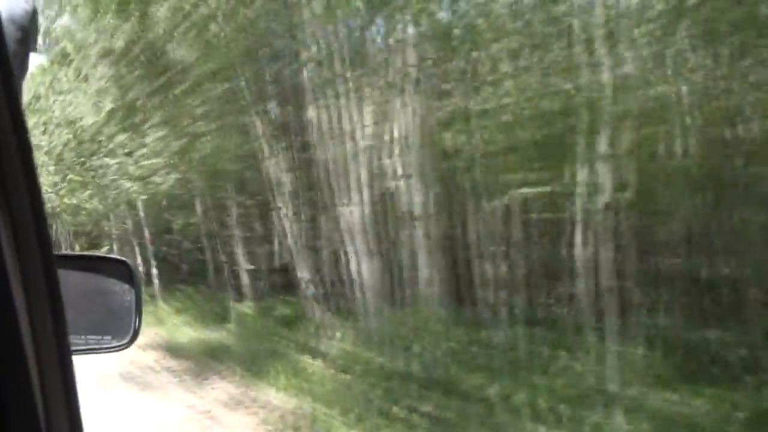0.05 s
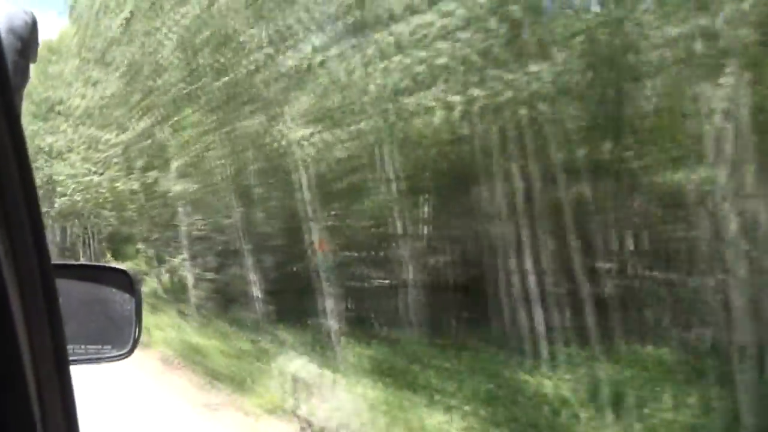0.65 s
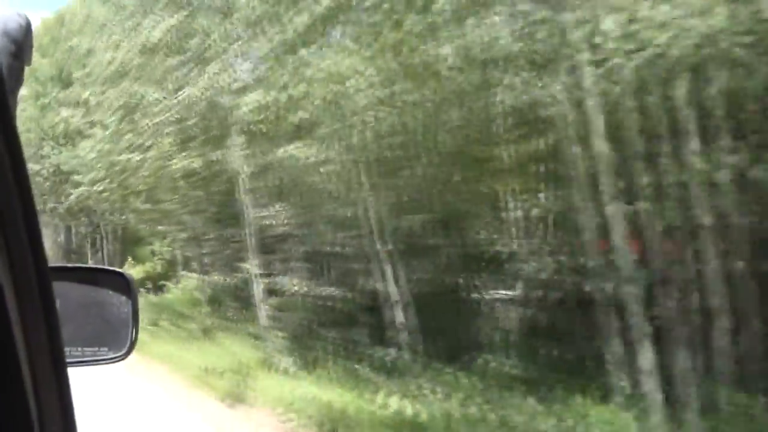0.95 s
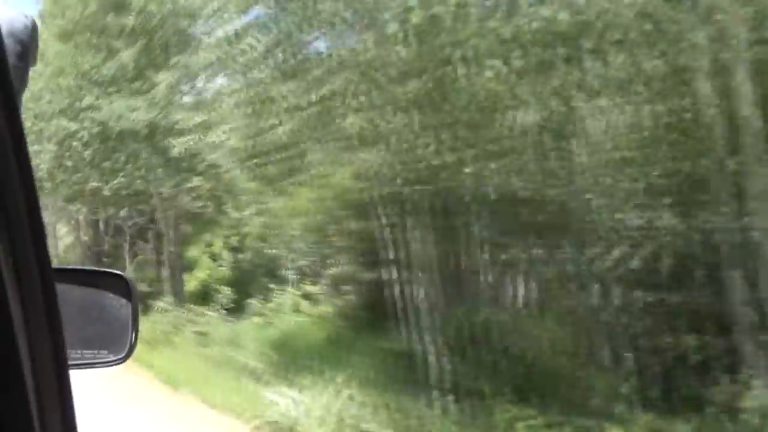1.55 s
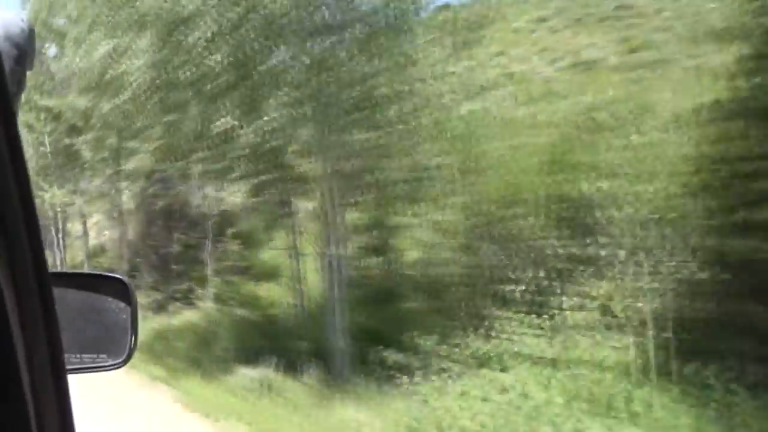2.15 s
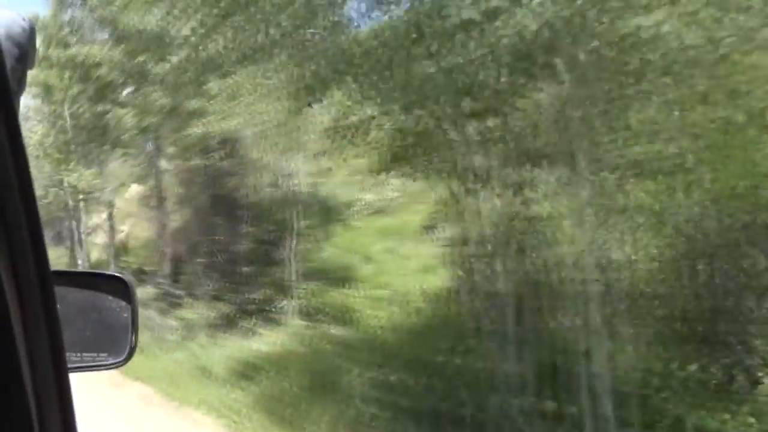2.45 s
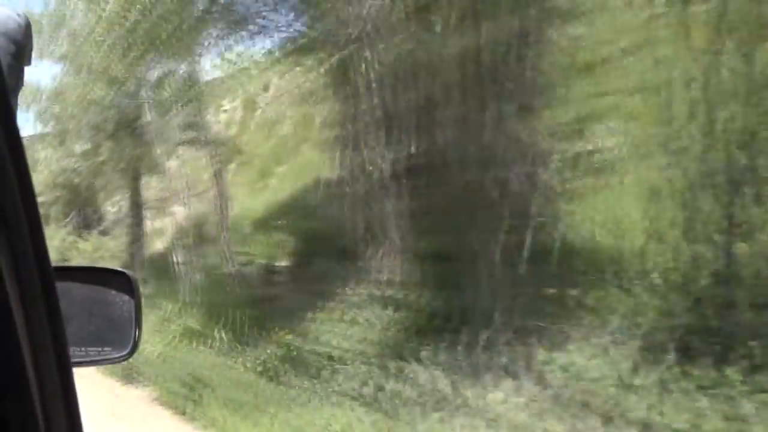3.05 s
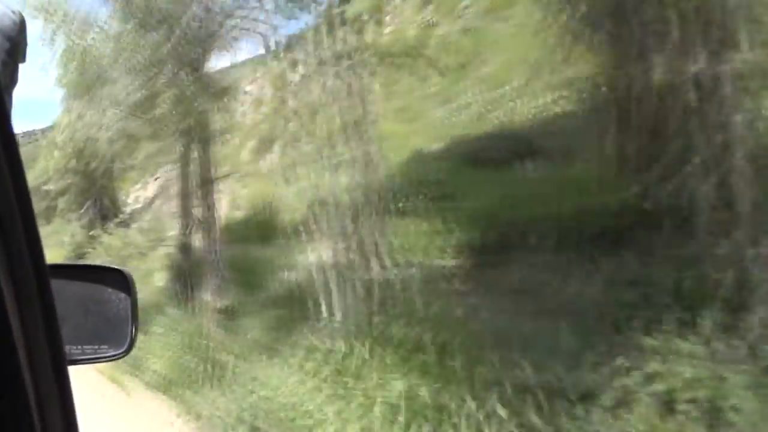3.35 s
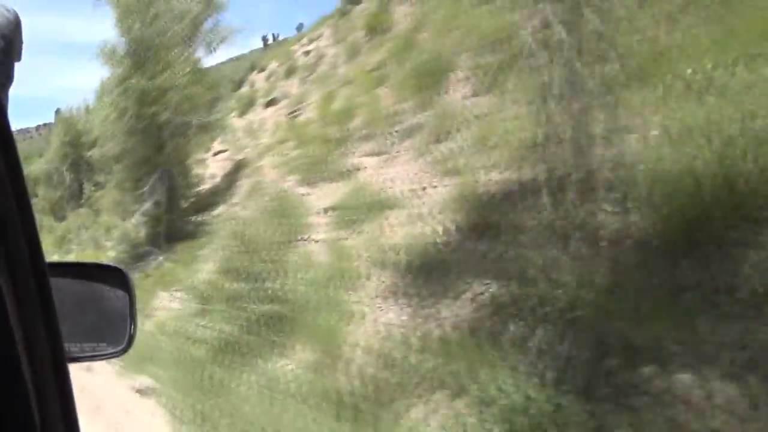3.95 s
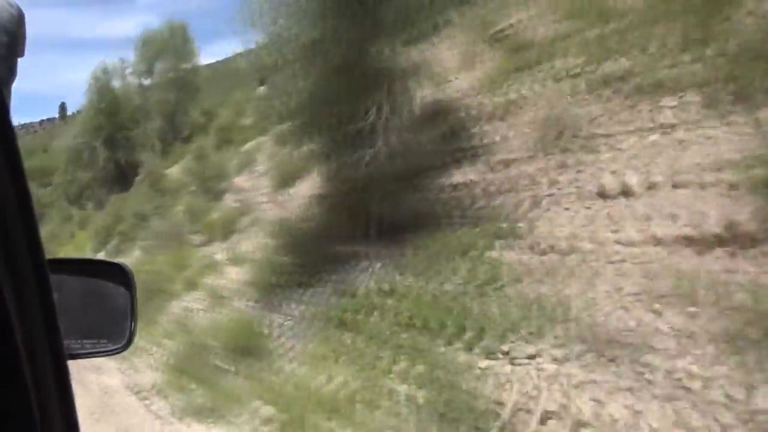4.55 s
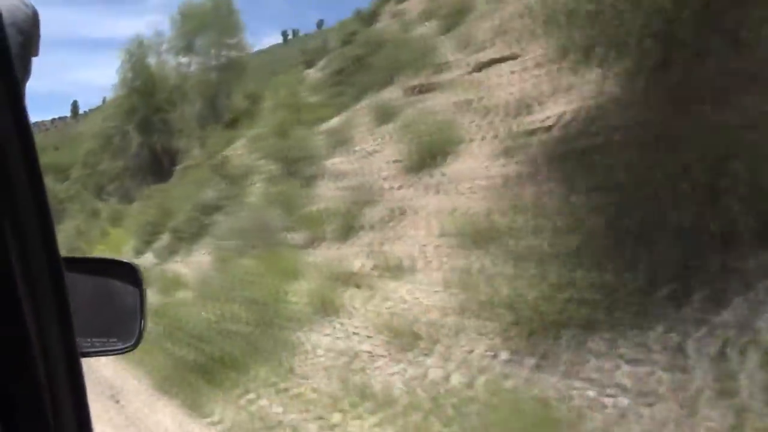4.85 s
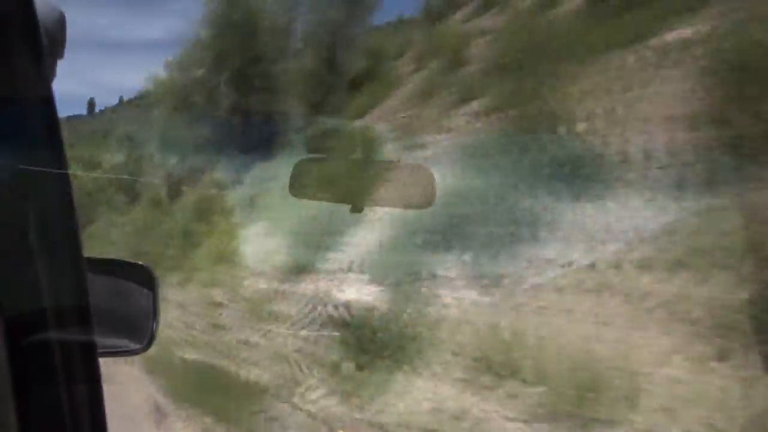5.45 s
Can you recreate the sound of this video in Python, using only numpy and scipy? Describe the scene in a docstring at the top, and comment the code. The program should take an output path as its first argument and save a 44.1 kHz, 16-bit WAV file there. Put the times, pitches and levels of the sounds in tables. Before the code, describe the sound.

A loud, low rumble of rushing air hits the microphone from start to finish as a car rolls down a dirt track with its window open. The wind flutters and thumps unevenly, mostly on the right, with a raspy edge. Far quieter are the gritty tyre hiss and thin buzzing of roadside insects, one sinking slightly in pitch as it passes midway. A broad hiss and high buzz rise at the close.

```python
"""A four-wheel-drive rolls along a dirt road with a side window open. From the start the turbulent
slipstream buffets the microphone, mostly its right port: a deep rumble, with flutter and rasp riding
on the eddies, over a faint hiss of tyres. Patches of insects buzz by in the roadside grass, their
song modulated by wing strokes. Near 2.6 s one passes close, its pitch sinking by the Doppler effect.
From about 5.2 s a broad hiss and a high insect buzz swell, with a lower hiss on the left."""
import sys
import numpy as np
from scipy import signal
from scipy.fft import rfft, irfft, next_fast_len
from scipy.io import wavfile
from scipy.ndimage import uniform_filter1d, minimum_filter1d

SR = 44100
rng = np.random.default_rng(int(sys.argv[2]) if len(sys.argv) > 2 else 0)


def dump(signal):
    """Clip the signal to [-1, 1] and save it as 16-bit WAV at the path in sys.argv[1]."""
    limited = np.clip(np.atleast_2d(signal).T, -1, 1)
    pcm = np.round(limited * 32767).astype(np.int16)
    wavfile.write(sys.argv[1], SR, pcm)


N = 247401
TIME = np.arange(N) / SR
SIZE = next_fast_len(N, real=True)
FREQS = np.maximum(np.arange(SIZE // 2 + 1) * SR / SIZE, 1)


# turbulent pressure spectrum, falling steeply towards the small eddies: f/Hz, level/dB
WIND_SPECTRUM = [(22, -34), (45, -4), (70, -0.5), (110, -0.5), (170, -2), (250, -7), (480, -16),
                 (700, -24.5), (1000, -33.5), (1700, -45), (2800, -55.5), (4500, -61), (7200, -68.5),
                 (15000, -76)]
# strength of the slipstream about its mean: t/s, level/dB
FLOW_LEVEL = [(0.0, 2), (0.55, -0.5), (0.72, 0), (2.42, -0.5), (2.6, 0.5), (3.6, 0.5), (4.1, -0.5),
              (4.7, 2.5), (5.15, 0), (5.35, 1.5), (5.6, 2.5)]
RUMBLE_DB, FLUTTER_DB, RASP_DB = -10.5, -22.5, -42.5   # base gains of large, middling and small eddies
def slipstream():
    """Turbulent intermittency: small eddies ride on larger ones, so the higher bands come in lumps."""
    flow_db = in_time(FLOW_LEVEL)[0] + 1.2 * drift(rate_hz=11.4)
    stall_db = stalls()
    rasp_db = RASP_DB + 2.14 * flow_db + 0.99 * stall_db
    eddies = rms_one(drift(rate_hz=61) + .5 * drift(rate_hz=400))
    lumps = lambda shared_db, own_db: from_db(shared_db * eddies + own_db * drift(rate_hz=265))
    rumble = evened(noise(WIND_SPECTRUM, low_hz=24, high_hz=288.5) * lumps(1.5, 0.84), span_s=0.036)
    flutter = evened(noise(WIND_SPECTRUM, low_hz=281, high_hz=1240) * lumps(3.5, 1), span_s=0.039)
    tearing = evened(lumps(1.5, 3), span_s=0.023)
    rasp = noise(WIND_SPECTRUM, low_hz=1112) * tearing
    lull = lulls(lead_s=0.0085, width_s=0.0034)
    crackle_left, crackle_right = crackles()
    right = (rumble * from_db(RUMBLE_DB + 1.6 * drift(rate_hz=42) + stall_db - 0.77 * lull)
             + flutter * from_db(FLUTTER_DB + flow_db + 0.51 * stall_db - 4.5 * lull)
             + rasp * from_db(rasp_db - 3.3 * lull)
             + stray_eddies() * from_db(-47.5 + flow_db + stall_db - lull)
             + buffets() + crackle_right)
    left = crossfeed(right) + fizz(rasp_db) * tearing + crackle_left
    return np.array([left, right])


# single eddies striking the port: t/s, level/dB, duration/s, relative push/dB, relative rasp/dB
EDDY_IMPACTS = [(0.009, -22.5, 0.014, 6, -21), (0.129, -20.5, 0.02, -0.5, -34),
                (0.165, -16, 0.037, 8.5, -28), (0.215, -12, 0.029, -2.5, -35),
                (0.324, -12.5, 0.016, -1, -32), (0.355, -20.0, 0.025, 13, -20),
                (0.382, -14.5, 0.012, 0, -31), (0.434, -15, 0.02, 11, -22), (0.482, -12, 0.012, 11, -22.5),
                (0.522, -16.5, 0.028, -2, -25), (0.562, -19.5, 0.029, -5.5, -24),
                (0.614, -26, 0.025, 11, -26), (0.653, -18.5, 0.0082, 8, -27),
                (0.745, -22.5, 0.011, 7.5, -24), (0.808, -18.5, 0.026, 0, -22.5),
                (0.874, -16.5, 0.016, 2.5, -21), (0.927, -17.5, 0.022, 10, -22),
                (0.977, -19.5, 0.009, -2, -23), (1.145, -16.0, 0.036, -8.5, -23.5),
                (1.19, -23.5, 0.02, -9, -16), (1.235, -17.5, 0.015, -2, -30),
                (1.418, -12.5, 0.009, 4.5, -34), (1.454, -17.5, 0.026, 3, -22),
                (1.515, -19.5, 0.014, -4, -23), (1.621, -22.5, 0.014, 4, -29),
                (1.713, -18.0, 0.014, 1, -30), (1.864, -20.5, 0.014, 21.5, -17),
                (1.961, -17.5, 0.015, 14, -29), (2.027, -20, 0.021, 7, -34), (2.057, -26, 0.013, 16.5, -16),
                (2.227, -19, 0.028, -0.5, -24), (2.285, -19.5, 0.01, 11.5, -19.5),
                (2.38, -23, 0.031, 13, -27), (2.508, -17, 0.02, 5, -26), (2.577, -17.0, 0.014, -8, -32),
                (2.61, -24.0, 0.011, 12.5, -21), (2.632, -19, 0.011, -13, -26),
                (2.726, -19, 0.023, 9.5, -30), (2.805, -17.5, 0.024, 5, -29),
                (2.915, -17.5, 0.04, 10.5, -28), (3.001, -18.5, 0.028, 12.5, -31),
                (3.047, -19, 0.012, -5.5, -31), (3.119, -14.5, 0.029, -0.5, -28),
                (3.163, -19, 0.021, 13.5, -21), (3.3, -17.5, 0.013, -3, -24),
                (3.337, -17.5, 0.014, 2.5, -26), (3.441, -17, 0.026, 3, -34), (3.484, -19, 0.031, 4.5, -29),
                (3.553, -19.5, 0.017, -2, -22), (3.578, -16.5, 0.022, 2.5, -28),
                (3.65, -15.5, 0.018, 2.5, -23.5), (3.743, -21, 0.012, 6.5, -24),
                (3.8, -19.5, 0.021, 14.5, -31), (3.899, -18, 0.012, 3.5, -26),
                (4.042, -22.5, 0.02, 10.5, -18), (4.205, -17.0, 0.025, 7, -32),
                (4.242, -16, 0.014, 7.5, -28), (4.268, -15.5, 0.051, -7, -24.5),
                (4.409, -15.5, 0.018, 3, -27), (4.453, -27, 0.015, 12, -16),
                (4.499, -11.5, 0.0077, -3, -36), (4.548, -17, 0.01, 14, -27), (4.629, -18, 0.051, 0, -25),
                (4.797, -21.5, 0.014, 16, -22), (4.866, -18.5, 0.03, 5, -23),
                (4.901, -15.5, 0.021, 12.5, -26), (4.956, -33.5, 0.011, -3, -27),
                (5.036, -17.5, 0.019, 3, -27), (5.166, -20.5, 0.0084, -1.5, -28),
                (5.232, -17, 0.018, 0.5, -29), (5.353, -13, 0.015, 3, -25), (5.58, -17, 0.024, -12, -19)]
SLAP_RISE_S, PUSH_RISE_S = 0.0018, 0.0033
def buffets():
    """An eddy's impact is a broadband pressure pulse: push, thud, smack and rasp die away together."""
    slaps = bursts([row[:3] for row in EDDY_IMPACTS], SLAP_RISE_S, steepness=2.36)
    push_rows = [(s, db + push_db, length_s) for s, db, length_s, push_db, _ in EDDY_IMPACTS]
    shoves = bursts(push_rows, PUSH_RISE_S, steepness=3)
    push = evened(noise(WIND_SPECTRUM, low_hz=60, high_hz=200), span_s=0.022)
    thud = from_db(2) * evened(noise(WIND_SPECTRUM, low_hz=252, high_hz=522), span_s=0.012)
    smack = from_db(-8) * evened(noise(WIND_SPECTRUM, low_hz=519, high_hz=1420), span_s=0.0061)
    rasp = noise(WIND_SPECTRUM, low_hz=1350) * from_db(-2 + 4.2 * drift(rate_hz=240))
    return shoves * push + slaps * (thud + smack) + puffs() * rasp


def puffs():
    """Eddy break-up: the envelope of the rasp that each impact tears off."""
    rows = [(s, db + rasp_db, length_s) for s, db, length_s, _, rasp_db in EDDY_IMPACTS]
    return bursts(rows, SLAP_RISE_S, steepness=4)


def lulls(lead_s, width_s):
    """Flow detachment: the air lets go of the port just before each impact; depth from 0 to 1."""
    dip = np.zeros(N)
    for s, *_ in EDDY_IMPACTS:
        near = slice(max(int(s * SR) - SR // 10, 0), int(s * SR) + SR // 50)
        dip[near] += np.exp(-((TIME[near] - s + lead_s) / width_s) ** 2)
    return np.minimum(dip, 1)


# brief stalls of the flow: t/s, level change/dB, half-duration/s
FLOW_STALLS = [(0.09, -5, 0.044), (0.287, -7.5, 0.027), (0.418, -3, 0.011), (0.674, -4, 0.023),
               (1.27, -3.5, 0.01), (1.797, -4, 0.041), (1.896, -3.5, 0.0069), (1.99, -6, 0.007),
               (2.159, -9, 0.019), (2.476, -2.5, 0.022), (2.894, -4.5, 0.018), (2.986, -10, 0.015),
               (3.098, -6, 0.0068), (3.407, -5.5, 0.028), (3.68, -7, 0.01), (3.835, -5, 0.007),
               (4.014, -18, 0.011), (4.144, -5, 0.014), (4.364, -6, 0.049), (4.7, -1, 0.008),
               (4.839, -6, 0.012), (5.195, -3.5, 0.015), (5.288, -11, 0.013)]
def stalls():
    """Flow noise needs moving air, so it dips abruptly at each stall; the dip in dB."""
    return sum(db * np.exp(-np.minimum(((TIME - s) / half_s) ** 4, 50)) for s, db, half_s in FLOW_STALLS)


# airflow tearing off the port: t/s, level/dB, duration/s, relative treble/dB
SEPARATIONS = [(0.166, -32.5, .002, -3), (0.211, -29.5, 0.0028, -14), (0.335, -28, 0.0032, -6),
               (0.363, -41, 0.0022, 2), (0.433, -33, 0.0033, 2), (0.484, -33, .002, -10),
               (0.573, -33, .003, 0), (0.867, -40, .002, -4), (0.949, -37, 0.0023, -5),
               (1.154, -34, 0.0032, -8), (1.168, -29, 0.0022, -5), (1.199, -33.5, 0.0054, -4),
               (1.247, -32, .003, -2), (1.421, -38, 0.0023, -18), (2.56, -28.5, 0.003, -11),
               (2.617, -36, .002, -3), (2.738, -31, 0.008, -11), (3.203, -37.5, 0.0017, 3),
               (3.299, -36, 0.0034, -10), (3.343, -42, .002, 0), (3.644, -34, 0.0017, -4),
               (3.66, -35, 0.0035, -11), (3.998, -37, 0.0018, -13), (4.267, -32, 0.0017, 2.5),
               (4.295, -32, .003, 0), (4.635, -30.5, 0.005, -1), (4.866, -27, 0.0033, -11),
               (5.065, -34, 0.0035, -4), (5.241, -33, .002, -6)]
def crackles(rise_s=0.0025, low_hz=1300, treble_hz=4800, top_hz=10000):
    """Flow separation spits dense bursts of tiny clicks, some dull, some bright; left and right."""
    grit = grains(per_s=6000)
    body = grit * bursts([row[:3] for row in SEPARATIONS], rise_s, steepness=3)
    treble_rows = [(s, db + treble_db, length_s) for s, db, length_s, treble_db in SEPARATIONS]
    treble = grit * bursts(treble_rows, rise_s, steepness=3)
    colour = rms_one(from_db(over_hz(WIND_SPECTRUM)) * above(low_hz, 4) * below(top_hz, 4))
    right = filtered(body, colour * below(treble_hz, 6)) + filtered(treble, colour * above(treble_hz, 6))
    left = from_db(-16) * filtered(treble, rms_one(from_db(over_hz(FIZZ_SPECTRUM))))
    return left, right


def stray_eddies():
    """A Poisson process: small eddies tick dully on the port at independent moments; rms 1."""
    colour = from_db(over_hz(WIND_SPECTRUM)) * above(750, 6) * below(2400, 4)
    return rms_one(filtered(grains(per_s=90), colour))


# share of the right port's wind heard on the left: f/Hz, amplitude ratio (negative = inverted)
PORT_TRANSFER = [(30, -0.18), (65, 0.24), (90, 0.36), (130, 0.62), (175, 0.55), (250, 0.48), (350, 0.26),
                 (480, 0.18), (600, -0.22), (800, -0.14), (900, -0.073), (1000, -0.15), (1250, -0.15),
                 (1700, 0.065), (4500, 0.12), (6000, -0.032)]
# gain on that share's upper band as the flow shifts: t/s, level/dB
LEAK_LEVEL = [(0, -3.5), (1.9, -0.5), (3.0, 1.5), (5.6, 1)]
def crossfeed(right, split_hz=270):
    """A transfer function: the right port faces the flow and the left hears a weaker, filtered copy."""
    share = over_hz(PORT_TRANSFER)
    lower = filtered(right, share * below(split_hz, 8))
    upper = filtered(right, share * above(split_hz, 8))
    return lower + upper * from_db(in_time(LEAK_LEVEL)[0])


# the left port's own thin fizz: f/Hz, level/dB
FIZZ_SPECTRUM = [(1200, -8), (4500, -20), (5200, -6.5), (6200, -3), (8200, -1.5), (10800, -25),
                 (11800, -30)]
def fizz(rasp_db):
    """Incoherent addition: the left port's fizz follows the summed powers of rasp and puffs."""
    return noise(FIZZ_SPECTRUM) * np.hypot(from_db(rasp_db - 16), from_db(-15) * puffs())


# passage of one insect beside the road: t/s, level/dB, left minus right/dB
NEAR_PASSAGE = [(1.3, -80, 9), (1.9, -58, 10), (2.1, -54.5, 11), (2.22, -50, 12), (2.3, -47, 12),
                (2.45, -46, 9), (2.54, -44.5, 5), (2.61, -47.5, 3), (2.8, -49, -3), (2.92, -54, -2),
                (3.02, -63, -2), (3.2, -85, 0)]
# its song: f/Hz, level/dB
NEAR_SPECTRUM = [(7000, -27), (7700, -12.5), (8300, -4), (9000, -1.5), (9500, 1), (10400, -2.5),
                 (11100, -8.5), (11700, -14), (13000, -14.5), (14200, -18.5), (15500, -33)]
STROKES_HZ, SONG_CENTRE_HZ, WANDER_SHARE = 44.66, 9490, 0.01   # common to this insect and the patches
def near_insect(pass_s=2.58, turn_s=0.12, doppler_share=0.013):
    """Doppler effect: a close insect chirps once per wing stroke, beat and pitch sinking as it passes."""
    level_db, pan_db = in_time(NEAR_PASSAGE)
    doppler = -doppler_share * np.tanh((TIME - pass_s) / turn_s)
    cycles = rng.random() + np.cumsum(STROKES_HZ * (1 + doppler)) / SR
    cycles += 0.06 * drift(rate_hz=40)   # uneven timing
    depth_db = np.maximum(5 + 0.27 * (level_db - level_db.max()), 0)   # strokes blur as the song fades
    strokes = from_db(depth_db * np.sin(2 * np.pi * cycles) + 1.8 * drift(rate_hz=90))
    strokes = evened(strokes, span_s=0.045)
    band = lambda: noise(NEAR_SPECTRUM, low_hz=7000, high_hz=11100, order=50)
    separate = np.array([band(), noise(NEAR_SPECTRUM, low_hz=7000)])
    song = rms_one(separate + from_db(-5.5) * band())
    song = shifted(song, SONG_CENTRE_HZ * (doppler + WANDER_SHARE * drift(rate_hz=60)))
    return from_db(level_db) * strokes * song * panned(pan_db)


# patches of insects: loudest t/s, swell time scale/s, left minus right/dB, stroke depth (0-1),
# buzz centre f/Hz, buzz level/dB, shrill level/dB, thin level/dB
INSECT_PATCHES = [(.12, 0.2, 2.5, 0.26, 9050, -50.5, -59, -68), (.25, 0.2, 2.5, 0.2, 10050, -57, -58, -70),
                  (.5, 0.53, 0, 0.14, 9450, -59.5, -60.5, -82),
                  (1.1, 0.559, -0.5, .15, 9450, -62, -65.5, -85),
                  (1.701, .4, 9, .25, 9250, -63, -68, -65.5),
                  (2.35, 0.27, 10.5, 0.1, 9600, -66.5, -58, -74),
                  (3.451, .25, 5.5, 0.2, 9500, -62, -65, -65), (3.789, 0.18, 8, 0.55, 9700, -56, -62, -63),
                  (5.59, 0.2, 13, 0.3, 9740, -52, -55.5, -56.5)]
# their main buzz: f/Hz, level/dB
BUZZ_SPECTRUM = [(6500, -45), (7500, -13), (8200, -5), (9000, -1), (9450, -0.5), (9900, -2), (10400, -4),
                 (11000, -6), (11700, -22.5), (14000, -32), (15600, -35)]
# shriller singers to the right: f/Hz, level/dB
SHRILL_SPECTRUM = [(9000, -13.5), (10500, 0), (11500, -1.5), (12200, -1.5), (12700, -12), (14200, -19),
                   (16000, -20)]
# singers of one thin, steady pitch to the left: f/Hz, level/dB
THIN_SPECTRUM = [(8000, -23), (9100, -17), (9480, 2), (9850, -4.5), (11000, -29.5)]
def insect_patches(falloff=1.9, screening=1.93, doppler_share=0.016):
    """Attenuation with distance: each patch swells and fades, its pulsing buzz Doppler-shifted."""
    buzz_power = (from_db(-64) * panned(7)) ** 2   # a far chorus, always there
    shrill_power = thin_power = weighted_offset = 0
    for s, swell_s, pan_db, depth, centre_hz, buzz_db, shrill_db, thin_db in INSECT_PATCHES:
        # the vehicle's body screens the singers behind it, so they fade faster than they came
        along_road = (TIME - s) / swell_s * np.where(TIME > s, screening, 1)
        distance = np.sqrt(1 + along_road ** 2)
        nearness = distance ** -falloff
        cycles = rng.random() + np.cumsum(STROKES_HZ * (1 + 0.0247 * drift(rate_hz=6))) / SR
        strokes = (1 + depth * np.sin(2 * np.pi * cycles)) / np.sqrt(1 + depth ** 2 / 2)
        power = (from_db(buzz_db) * nearness * strokes * panned(pan_db)) ** 2
        heard_hz = centre_hz * (1 - doppler_share * along_road / distance)
        buzz_power = buzz_power + power
        weighted_offset += power * (heard_hz - SONG_CENTRE_HZ)
        shrill_power += (from_db(shrill_db) * nearness) ** 2
        thin_power += (from_db(thin_db) * nearness) ** 2
    direct = from_db(-15.5) * noise(BUZZ_SPECTRUM)   # shared by both ports
    scattered = np.array([noise(BUZZ_SPECTRUM), noise(BUZZ_SPECTRUM)])   # by the grass
    offset_hz = weighted_offset / buzz_power
    wander_hz = WANDER_SHARE * SONG_CENTRE_HZ * drift(rate_hz=40)
    song = shifted(rms_one(direct + scattered), offset_hz + wander_hz)
    buzz = np.sqrt(buzz_power) * from_db(1.6 * drift(rate_hz=25)) * song
    shrill = np.sqrt(shrill_power) * shifted(noise(SHRILL_SPECTRUM, low_hz=8500), offset_hz[0])
    thin = np.sqrt(thin_power) * noise(THIN_SPECTRUM, low_hz=8000)
    return buzz + shrill * from_db([[-18], [0]]) + thin * from_db([[2], [-7]])


# course of the broad hiss, which swells at the end: t/s, level/dB
BROAD_HISS_LEVEL = [(0, -47), (1, -52), (3, -48.5), (5.15, -50), (5.35, -43.5), (5.6, -43)]
# spectrum of tyres on dirt: f/Hz, level/dB
ROLLING_SPECTRUM = [(40, -4), (200, 10.5), (500, 1), (900, 0.5), (1300, -15), (1800, -6), (2800, -10.5),
                    (5000, -15), (7500, -25), (10000, -28), (14000, -44)]
def tyres():
    """Rolling noise: dirt under the wheels gives a diffuse, gritty hiss, louder on the window side."""
    grit = from_db(1.4 * drift(rate_hz=200))
    left = from_db(-4) * noise(ROLLING_SPECTRUM, high_hz=2400, order=4)
    right = from_db(8.5) * noise(ROLLING_SPECTRUM)
    return from_db(in_time(BROAD_HISS_LEVEL)[0]) * grit * np.array([left, right])


# a hiss on the left that swells at the end: t/s, level/dB
HISS_SWELL = [(0, -67), (5.1, -79.5), (5.3, -53), (5.6, -54)]
# its spectrum: f/Hz, level/dB
HISS_SPECTRUM = [(900, 0.5), (1400, 4.5), (1750, -1), (2100, -8.5), (2600, -16), (4000, -10), (8000, -20)]
def left_hiss():
    """Band-limited noise, placed on the left by a level difference between the ports."""
    hiss = noise(HISS_SPECTRUM, low_hz=900, high_hz=9000)
    return from_db(in_time(HISS_SWELL)[0]) * hiss * from_db([[0], [-12]])


def from_db(db):
    """Amplitude ratio of a level in decibels."""
    return np.exp(np.asarray(db) * np.log(10) / 20)


def rms_one(x):
    """Normalisation to unit rms."""
    return x / np.sqrt(np.mean(x ** 2) + 1e-20)


def in_time(rows):
    """Linear interpolation of each column at every sample."""
    s, *columns = np.transpose(rows)
    return [np.interp(TIME, s, c) for c in columns]


def over_hz(points):
    """Interpolation of a table over log frequency."""
    hz, value = np.transpose(points)
    return np.interp(np.log(FREQS), np.log(hz), value)


def above(hz, order):
    """High-pass response, one half at hz."""
    return 1 / (1 + (hz / FREQS) ** order)


def below(hz, order):
    """Low-pass response, one half at hz."""
    return 1 / (1 + (FREQS / hz) ** order)


def filtered(x, gain):
    """Filtering by multiplication of the spectrum."""
    return irfft(rfft(x, SIZE) * gain, SIZE)[:N]


def noise(spectrum, low_hz=15, high_hz=16000, order=12):
    """Spectral shaping of Gaussian noise between two band edges; rms 1."""
    edges = np.sqrt(above(low_hz, order) * below(high_hz, order))
    white = rng.standard_normal(2 * len(FREQS)).view(complex)
    return rms_one(irfft(white * from_db(over_hz(spectrum)) * edges, SIZE)[:N])


def drift(rate_hz):
    """Low-pass noise: random wandering up to about this rate, drawn at every 20th sample; spread 1."""
    hz = np.arange(N // 40 + 2) * SR / (N + 1)
    white = rng.standard_normal((len(hz), 2)) @ [1, 1j]
    slow = irfft(white / (1 + (hz / rate_hz) ** 2))
    return np.interp(np.arange(N) / 20, np.arange(len(slow)), rms_one(slow))


def grains(per_s):
    """Shot noise: random clicks of uneven size and sign; rms 1."""
    born = rng.random(N) < per_s / SR
    return rms_one(born * rng.standard_normal(N))


def evened(x, span_s):
    """Division by the running rms holds the slow level at 1 and keeps the fast lumps."""
    width = max(int(span_s * SR), 2)
    power = uniform_filter1d(uniform_filter1d(x ** 2, width), width)
    return x / np.sqrt(np.maximum(power, 1e-9))


def bursts(rows, rise_s, steepness):
    """Superposed envelopes (t/s, level/dB, duration/s); steepness 1 is an exponential decay."""
    envelope = np.zeros(N)
    for s, db, length_s in rows:
        near = slice(max(int(s * SR) - SR // 20, 0), int(s * SR) + SR // 5)
        age = TIME[near] - s
        release = np.minimum((np.maximum(age, 0) / max(length_s, 1e-3)) ** steepness, 50)
        envelope[near] += from_db(db) * np.exp(np.minimum(age / rise_s, -release))
    return envelope


def panned(pan_db):
    """Constant-power panning: left and right gains for a level difference."""
    sides = from_db(np.vstack([pan_db, -pan_db]) / 2)
    return sides / np.sqrt(np.mean(sides ** 2, axis=0))


def shifted(x, by_hz):
    """Single-sideband modulation slides every frequency by the same changing amount."""
    analytic = signal.hilbert(x, SIZE)[..., :N]
    return np.real(analytic * np.exp(2j * np.pi * np.cumsum(by_hz, axis=-1) / SR))


def scene():
    """Superposition of the wind on the ports and the faint sounds of the roadside."""
    return slipstream() + insect_patches() + near_insect() + tyres() + left_hiss()


def record(dry):
    """Look-ahead limiting holds the peaks under full scale; a low-pass stops the band above 16.5 kHz."""
    allowed_gain = np.minimum(1, .99 / np.maximum(np.abs(dry).max(axis=0), 1e-6))
    gain = minimum_filter1d(allowed_gain, size=600)
    gain = uniform_filter1d(uniform_filter1d(gain, size=300), size=300)
    return signal.sosfilt(signal.cheby2(12, 70, 16500, fs=SR, output="sos"), dry * gain)


dry = scene()
out = record(dry)
dump(out)
```